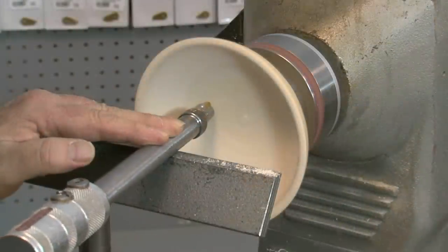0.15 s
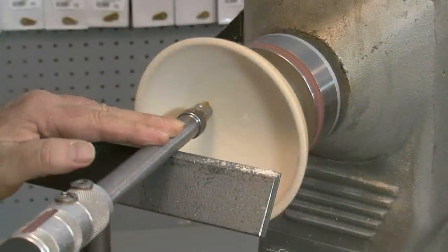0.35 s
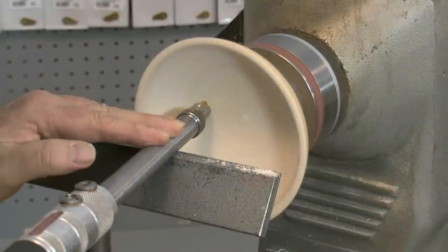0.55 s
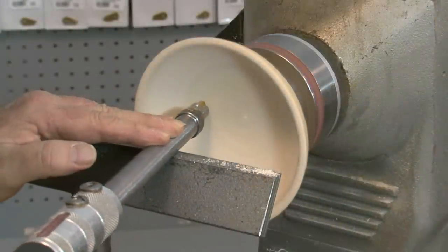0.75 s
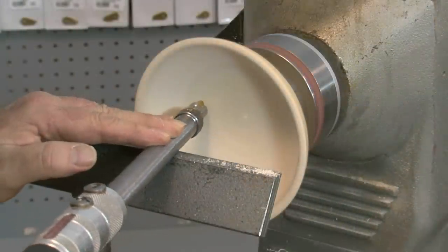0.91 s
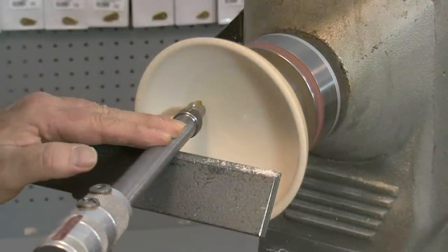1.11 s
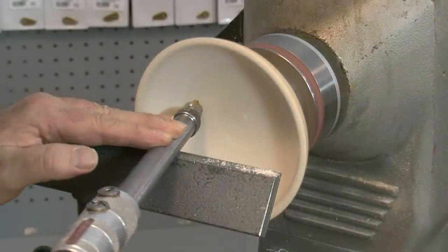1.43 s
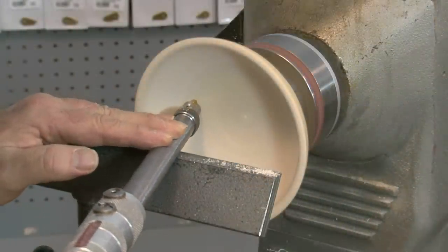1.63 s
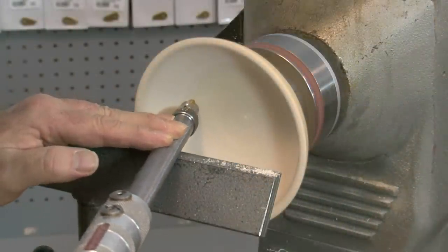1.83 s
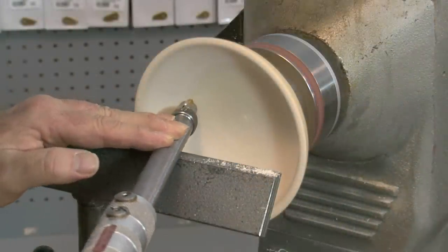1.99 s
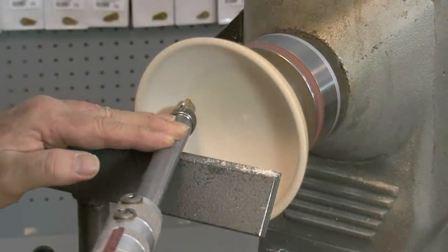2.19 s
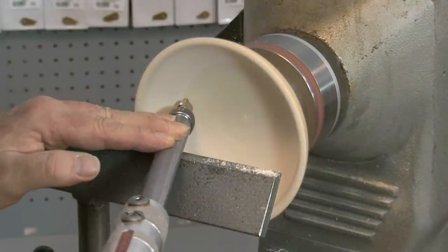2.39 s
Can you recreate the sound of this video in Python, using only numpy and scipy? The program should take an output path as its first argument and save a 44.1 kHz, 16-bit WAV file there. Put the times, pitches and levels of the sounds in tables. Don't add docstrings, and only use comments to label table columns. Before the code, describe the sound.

A steel cutter shaves a spinning wooden bowl: one unbroken, bright, hissing scrape with a rapid flutter and shifting metallic ring, very faint lathe hum beneath, heard close and dry in a workshop, nearly mono.

```python
import sys
import numpy as np
from scipy import signal
from scipy.fft import rfft, irfft, next_fast_len
from scipy.io import wavfile
from scipy.ndimage import uniform_filter1d, map_coordinates

SR = 44100
rng = np.random.default_rng(int(sys.argv[2]) if len(sys.argv) > 2 else 0)


def magnitude_from_level(level_db):
    exponent = np.asarray(level_db, float) / 20
    return 10 ** exponent


def store_wav(level_fs):
    pcm = np.round(np.clip(np.atleast_2d(level_fs), -1, 1) * 32767)
    wavfile.write(sys.argv[1], SR, pcm.T.astype(np.int16))


N = 112454
TURN_HZ = 25.043
T_S = np.arange(N) / SR
ANGLE_RAD = 2 * np.pi * TURN_HZ * T_S


def unit(x):
    return x / np.sqrt(np.mean(x ** 2) + 1e-20)


def along(points, hz):
    f, value = np.transpose(points)
    return np.interp(np.log(hz + 1), np.log(f + 1), value)


def curves(rows):
    t_s, *columns = np.transpose(rows)
    return [np.interp(T_S, t_s, column) for column in columns]


def wobble(knots_hz):
    knots = rng.standard_normal(int(N * knots_hz / SR) + 4)
    return map_coordinates(knots, [np.arange(N) * knots_hz / SR])


def noise(response):
    m = next_fast_len(2 * N)
    spectrum = rfft(rng.standard_normal(m)) * response(np.fft.rfftfreq(m, 1 / SR))
    return unit(irfft(spectrum, m)[:N])


def modes(table, hz):
    total = 0
    for k, (centre_hz, width_hz, db) in enumerate(table):
        damping = 1j * hz * width_hz
        total = total + (-1) ** k * magnitude_from_level(db) * damping / (centre_hz ** 2 - hz ** 2 + damping)
    return total


def while_on(start_s, end_s):
    fade_s = 0.057
    return np.clip(np.minimum(T_S - start_s, end_s - T_S) / fade_s + .5, 0, 1)


def steady(x, turns):
    power = np.abs(uniform_filter1d(x ** 2, int(turns * SR / TURN_HZ)))
    return x / np.sqrt(power + 1e-3)


# f/Hz, line spread/Hz
RENEWAL = [(300, 0.596), (1200, 1.59), (3000, 2.197), (6000, 1.2), (12000, 3.1)]
# f/Hz, share/0-1
RETURNING = [(300, 0.64), (1200, 0.83), (3000, 0.98), (6000, 0.84), (9500, 0.54), (12500, 0)]


def surface(hz):
    spread_hz = np.clip(along(RENEWAL, hz), .3, 8)
    share = np.clip(along(RETURNING, hz), 0, 1)
    off_hz = hz - TURN_HZ * np.round(hz / TURN_HZ)
    lines = np.exp(-.5 * (off_hz / spread_hz) ** 2) * TURN_HZ / (spread_hz * np.sqrt(2 * np.pi))
    return np.sqrt(share * lines + 1 - share)


# times/turn, level/dB, phase/rad
END_GRAIN_SWELL = [(1, 0.57, 4.61), (2, 1.0, 1.49)]


def grain_db():
    return sum(db * np.cos(k * ANGLE_RAD + phase) for k, db, phase in END_GRAIN_SWELL)


def favour(x, centre_hz):
    width_hz, lift_db = 182.6, 5.5
    hz, t, z = signal.stft(x, SR, nperseg=512)
    centre = np.interp(t * SR, np.arange(N), centre_hz)
    lift = 1 + magnitude_from_level(lift_db) * np.exp(-.5 * ((hz[:, None] - centre) / width_hz) ** 2)
    return signal.istft(z * lift, SR, nperseg=512)[1][:N]


def scrape(body, grain, centre_hz=None):
    x = noise(lambda hz: surface(hz) * body(hz))
    if centre_hz is not None:
        x = unit(favour(x, centre_hz))
    swell_db = grain * grain_db() + 1.014 * wobble(8.626)
    return unit(steady(x, turns=4.8) * magnitude_from_level(swell_db))


def part(level_db, table, centre_hz=None, grain=0.13):
    ring = scrape(lambda hz: np.abs(modes(table, hz)) ** 1.278, grain, centre_hz)
    return magnitude_from_level(level_db - 0.7462) * ring


# t/s, level/dB
SHAVING = [(0, -46.5), (.3, -44.5), (.45, -43.5), (.7, -42.5), (.805, -44), (.825, -44.5), (.95, -42.5),
           (1.05, -44.5), (1.33, -42.5), (1.47, -43), (1.68, -43.5), (1.79, -43.5), (1.85, -45),
           (2.03, -44), (2.15, -42), (2.29, -43.5), (2.36, -46), (2.55, -44.5)]
# f/Hz, level/dB per Hz
FIBRE_HISS = [(900, -44.5), (2350, -21), (3400, -4), (7000, -5.5), (7800, -2.5), (9500, -8), (12000, -13),
              (15000, -25)]


def shaving():
    level_db, = curves(SHAVING)
    return magnitude_from_level(level_db + 1.5) * scrape(lambda hz: magnitude_from_level(along(FIBRE_HISS, hz)), grain=0.68)


# f/Hz, width/Hz, level/dB
BAR_MODES = [(1213.2, 51.4, 9), (1064, 130, -10), (1346, 100, -17)]
FALTER = [(1, .44, .91), (2, .4, -1.22), (3, .27, -.61), (4, .1, 2.2)]
# t/s, locked ring/dB, depth of its break each turn/0-1.5, loose ring/dB
BAR_RING = [(0, -56.5, 0.35, -54.5), (.3, -56.5, 1, -53.5), (.36, -53, 1, -52.5), (.54, -50, 1.1, -59),
            (.61, -56.5, 0.96, -54.5), (.67, -50.5, 0.12, -53.5), (.8, -61, 0.87, -53), (.825, -46, 1, -57),
            (.91, -46.5, 0.91, -57.5), (.97, -51, 0.85, -55), (1.04, -56, 0.45, -61.5),
            (1.1, -51.5, 0.15, -57.5), (1.22, -52, 0.27, -53.5), (1.36, -54, 0.15, -54.5),
            (1.45, -46.5, 0.27, -55), (1.53, -52, 0.36, -52.5), (1.66, -54.5, 1, -56),
            (1.79, -51.5, 1, -56), (1.84, -46, 0.97, -54), (2.03, -46, 1.08, -57),
            (2.13, -51.5, 1.4, -58.5), (2.26, -47.5, 1.1, -58), (2.315, -50, 0.94, -54),
            (2.37, -63.5, 0.55, -59.5), (2.45, -58, 0.52, -54.5), (2.55, -55, 0.45, -56.5)]


def chatter():
    marks_per_turn = 48.06
    clear_hz, clear_share = 40, .7
    level_db, depth, loose_db = curves(BAR_RING)

    def loose_bar(hz):
        beside = 1 - clear_share * np.exp(-((hz - marks_per_turn * TURN_HZ) / clear_hz) ** 2)
        return modes(BAR_MODES, hz) * beside * hz ** 2 / (hz ** 2 + 600 ** 2)

    loose = scrape(loose_bar, grain=1.1)
    falter = 1 + depth * sum(size * np.cos(k * ANGLE_RAD + phase) for k, size, phase in FALTER)
    tone = np.sin(marks_per_turn * ANGLE_RAD + 0.87 * wobble(4.584))
    locked = steady(falter * tone, turns=1.6)
    return magnitude_from_level(level_db + 0.7 * wobble(18)) * locked + magnitude_from_level(loose_db) * loose


# t/s, holder/dB, edge/dB, edge centre f/Hz, bar overtone/dB, tool rest/dB
STEEL_RING = [(0.0, -48, -48, 6940, -53, -54), (0.09, -52.5, -49.5, 6700, -59, -54),
              (0.2, -51.5, -48.5, 6750, -53, -46.5), (0.29, -46, -45.5, 6890, -60, -54),
              (0.63, -49.5, -44, 6736, -64.5, -50), (0.82, -42.5, -49.5, 6860, -56.5, -50),
              (0.89, -49.5, -43, 6666, -56.5, -54.5), (0.99, -50.5, -41.5, 6600, -55, -49.5),
              (1.13, -43, -45.5, 6630, -63.5, -51.5), (1.23, -50, -45, 6720, -59.5, -49),
              (1.34, -47.5, -46, 6780, -57, -52), (1.45, -54, -47.5, 6600, -60, -58),
              (1.65, -52.5, -48.5, 6690, -57.5, -48.5), (1.96, -44.5, -49.5, 6460, -60.5, -58),
              (2.14, -50.5, -41.5, 6445, -68.5, -58), (2.19, -46, -48, 6510, -60.5, -61.5),
              (2.41, -50.5, -46.5, 6500, -68.5, -65), (2.55, -51.5, -47, 6650, -65.5, -61.5)]
# t/s, spread/s, holder lift/dB
LOOSE_GRIP = [(.25, 0.034, 2.5), (.76, 0.0274, 2), (1.38, 0.028, 3), (2.16, 0.062, 3)]
# f/Hz, width/Hz, level/dB
HOLDER_MODES = [(5190, 210, 0), (5440, 240, -3), (5782, 230, -5)]
EDGE_MODES = [(6284, 257, -1), (6600, 88, 0.5), (6920, 272, -4.5)]
OVERTONE_MODES = [(1793.2, 110, -6), (1960, 130, -1), (2200, 90, -7)]
REST_MODES = [(2561.8, 165, -5), (2742, 195, -9.5), (2636, 127, -6)]


def steel():
    holder_db, edge_db, edge_hz, overtone_db, rest_db = curves(STEEL_RING)
    for s, spread_s, lift_db in LOOSE_GRIP:
        holder_db = holder_db + lift_db * np.exp(-.5 * ((T_S - s) / spread_s) ** 2)
    holder = part(holder_db, HOLDER_MODES)
    edge = part(edge_db, EDGE_MODES, edge_hz)
    return holder + edge + part(overtone_db, OVERTONE_MODES) + part(rest_db, REST_MODES)


# t/s, wall/dB, wall centre f/Hz, rim/dB, rim centre f/Hz, foot/dB
BOWL_RING = [(0.0, -49.5, 3250, -51, 4150, -65.5), (0.02, -46.5, 3360, -49.5, 4450, -60),
             (0.13, -49.5, 3310, -45.5, 4160, -57.5), (0.25, -47, 3294, -42, 4056, -54),
             (0.42, -45, 3226, -46, 4270, -55), (0.53, -46, 3233, -45, 3975, -58),
             (0.67, -47, 3130, -43, 4350, -60.5), (0.76, -47.5, 3300, -43.5, 4264, -57),
             (0.92, -44.5, 3310, -46.5, 4160, -62), (1.22, -43, 3210, -45, 4285, -59.5),
             (1.24, -43.5, 3220, -48, 4250, -58.5), (1.55, -48, 3230, -44.5, 4328, -61),
             (1.64, -47, 3200, -44, 4065, -60.5), (1.74, -49, 3050, -46.5, 4300, -61),
             (2.05, -45.5, 3473, -38.5, 4070, -61.5), (2.17, -55.5, 3430, -42, 4013, -57),
             (2.48, -51, 3260, -45.5, 4563, -61), (2.55, -49, 3440, -49, 3860, -62.5)]
# f/Hz, width/Hz, level/dB
WALL_MODES = [(2861.6, 111, -1.5), (3200, 120.6, -4.5), (3310, 45.5, 2.5), (3420.7, 243, -3.5)]
RIM_MODES = [(3845, 205, -1.5), (4160, 521, -0.5), (4472.7, 531, 0.5), (4619, 147, 1)]
FOOT_MODES = [(545.1, 90.4, -7.5), (645.1, 46.9, -3.5), (897.4, 114.7, 0), (1044, 64, -1.5)]


def bowl():
    wall_db, wall_hz, rim_db, rim_hz, foot_db = curves(BOWL_RING)
    wall = part(wall_db, WALL_MODES, wall_hz, grain=1.4)
    rim = part(rim_db, RIM_MODES, rim_hz, grain=1.4)
    return wall + rim + part(foot_db, FOOT_MODES)


# f/Hz, level/dB per Hz
RUMBLE = [(15, -19.5), (30, -17), (92, -9), (130, -14.5), (250, -6), (320, -10.5), (500, 0), (900, -37)]
# f/Hz, level/dB rms
HUM_TONES = [(150.7, -89.5), (199.2, -97), (247.6, -85.5), (376.8, -91.5)]


def lathe():
    rumble = noise(lambda hz: magnitude_from_level(along(RUMBLE, hz)) * surface(hz))
    out = magnitude_from_level(-73 + 0.59 * wobble(5.16)) * rumble
    for hz, db in HUM_TONES:
        out += magnitude_from_level(db + 2 + 5.0 * wobble(5.416)) * np.sin(2 * np.pi * hz * T_S)
    return out


# from/s, to/s, place in turn/0-1, f/Hz, peak/dB
HARD_SPOTS = [(0, 0.142, .6, 3280, -38), (0.307, .6, .28, 3240, -39.5), (0.39, 0.627, .84, 3290, -39.5),
              (0.157, 0.248, .39, 4176, -45.5), (0.935, 1.226, .76, 4240, -41),
              (0.93, 1.16, 0.63, 3304, -45), (.25, 0.773, 0, 1387, -59), (.6, 0.973, 0.6, 1397, -57),
              (1.392, 1.956, 0.7, 1438, -56), (1.3, 1.894, 0.14, 1528, -57), (2, 2.48, .82, 1407, -57)]


def spots():
    knock_s, vary_db = 0.002, 1.5
    out = np.zeros(N)
    for start_s, end_s, place, hz, db in HARD_SPOTS:
        since_s = ((TURN_HZ * T_S - place + .5) % 1 - .5) / TURN_HZ
        knock = np.exp(-.5 * (since_s / knock_s) ** 2) * np.sin(2 * np.pi * hz * since_s)
        out += magnitude_from_level(db + 2.5 + vary_db * wobble(20)) * while_on(start_s, end_s) * knock
    return out


# from/s, to/s, f/Hz, level/dB rms
LOCKED_MODES = [(.62, .77, 4382, -52), (2.2, 2.36, 4382, -53), (2.02, 2.3, 3905, -55), (.2, .31, 5208, -55),
                (.68, .86, 5208, -55), (.8, 1.2, 3306, -55), (1.3, 2.05, 3306, -57), (1.1, 1.4, 3005, -56),
                (.1, .32, 4155, -53), (.08, .3, 2004, -63), (1.28, 1.78, 2004, -66),
                (1.86, 2.07, 2004, -64), (.25, .52, 1027, -64), (.12, .35, 901, -66),
                (1.45, 2.3, 250.4, -84), (.3, .5, 5860, -54)]


def squeals():
    out = np.zeros(N)
    for start_s, end_s, hz, db in LOCKED_MODES:
        beat = 1 + .8 * np.cos(2 * ANGLE_RAD + 2 * np.pi * rng.random())
        tone = np.sin(2 * np.pi * hz * T_S + 1.1 * wobble(12))
        out += magnitude_from_level(db + 2) * while_on(start_s, end_s) * beat * tone
    return out


# f/Hz, level/dB per Hz
SIDE_NOISE = [(13, -52.5), (22, -31), (1150, -17.5), (2160, -13.5), (3930, -23), (4890, -12),
              (6420, -15.5), (9150, -11.5), (15000, -9.5)]
# t/s, lift/dB
SIDE_FITS = [(.14, 19), (.19, 11.5), (.54, 7.5), (.6, 7.5), (.9, 7), (1.11, 10.5), (1.3, 18), (1.35, 9),
             (1.55, 7.5), (1.81, 15), (1.89, 12), (2.34, 7)]


def side_noise():
    fit_db = 1.88 * wobble(22.13)
    for s, lift_db in SIDE_FITS:
        fit_db = fit_db + lift_db * np.exp(-((T_S - s) / 0.0192) ** 2)
    return magnitude_from_level(-75.5 + fit_db) * noise(lambda hz: magnitude_from_level(along(SIDE_NOISE, hz)))


def scene():
    mid = shaving() + chatter() + steel() + bowl() + lathe() + spots() + squeals()
    side = side_noise()
    return np.array([mid + side, mid - side])


def top_cut(x):
    return signal.sosfilt(signal.butter(12, 15110, fs=SR, output="sos"), x)


# t/s, length/s
TOP_OPEN = [(.06, 0.053), (0.189, 0.033), (.83, 0.052), (.9, 0.025), (1.095, 0.044), (1.331, 0.025),
            (1.475, 0.076), (1.937, 0.083), (2.1, 0.055), (2.314, 0.162), (2.521, 0.068)]


def record(dry):
    is_open = sum(np.clip((length_s / 2 - np.abs(T_S - s)) / .012 + .5, 0, 1) for s, length_s in TOP_OPEN)
    shut = 1 - np.clip(is_open, 0, 1)
    top = irfft(rfft(dry) * (np.fft.rfftfreq(N, 1 / SR) > 14400), N)
    return top_cut(dry - shut * top)


dry = scene()
out = record(dry)
store_wav(out)
```